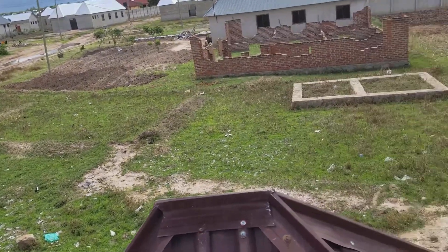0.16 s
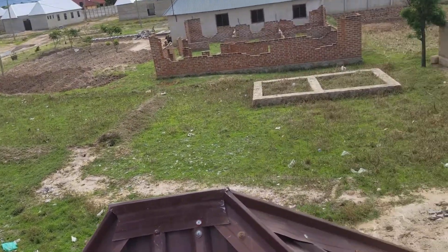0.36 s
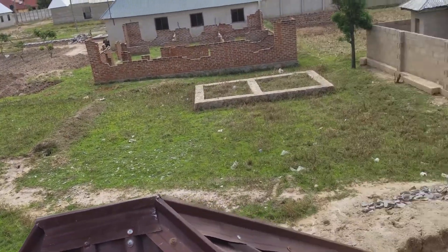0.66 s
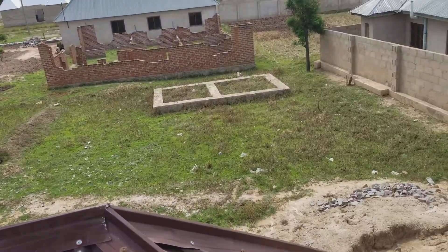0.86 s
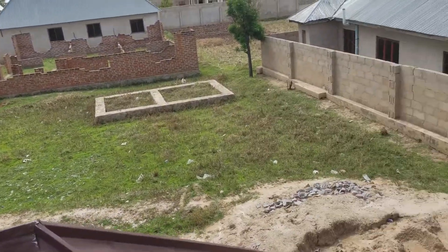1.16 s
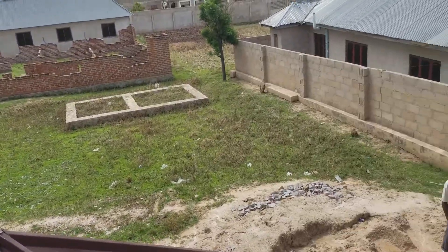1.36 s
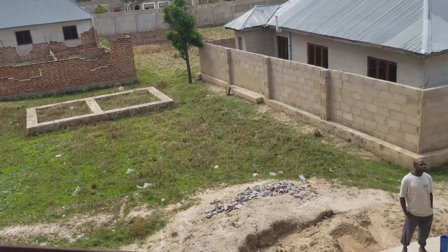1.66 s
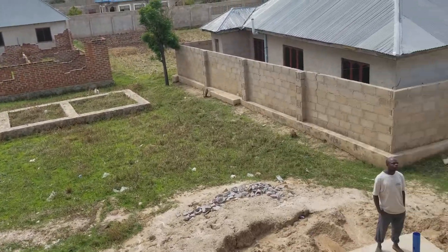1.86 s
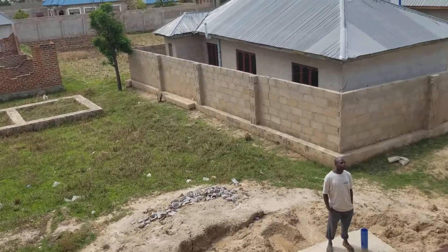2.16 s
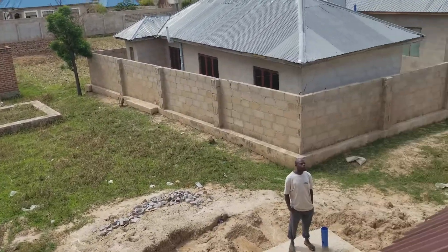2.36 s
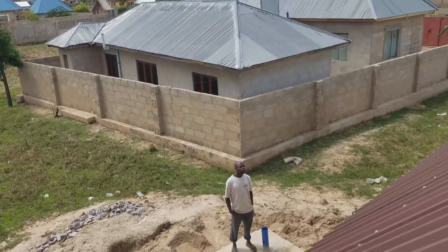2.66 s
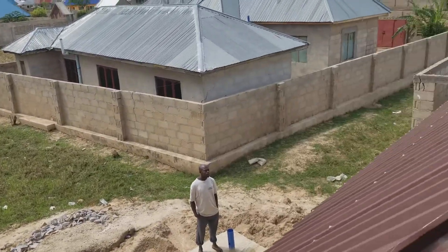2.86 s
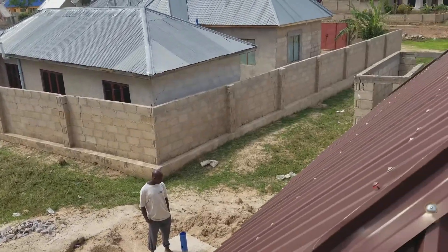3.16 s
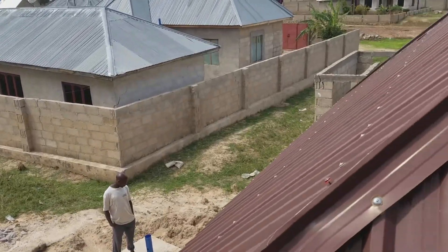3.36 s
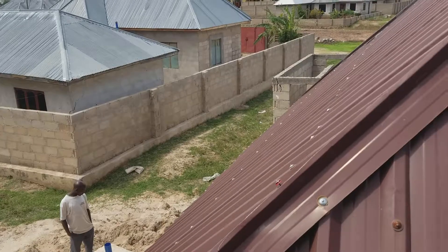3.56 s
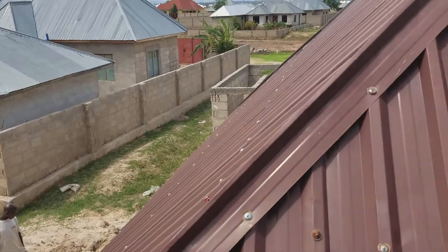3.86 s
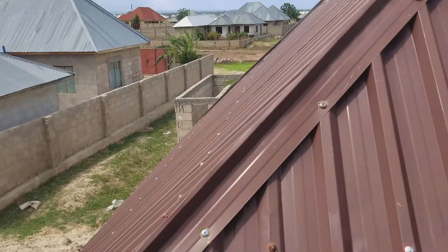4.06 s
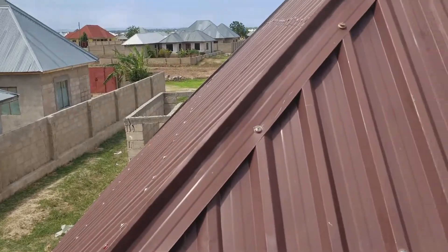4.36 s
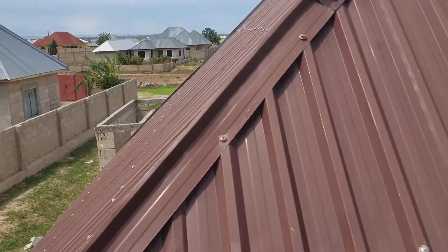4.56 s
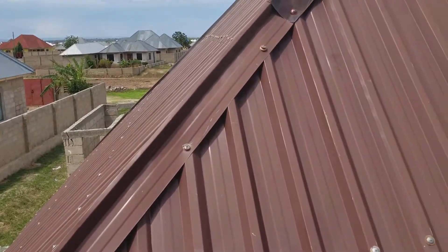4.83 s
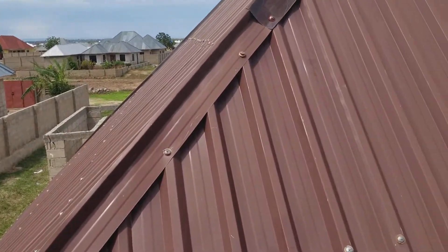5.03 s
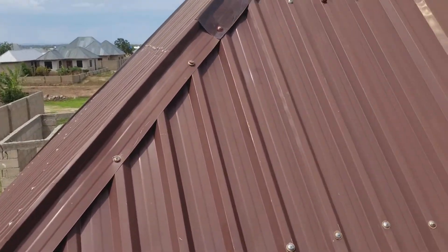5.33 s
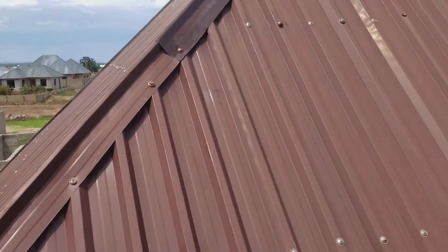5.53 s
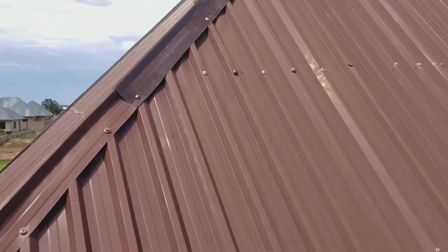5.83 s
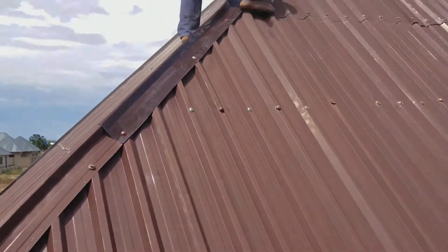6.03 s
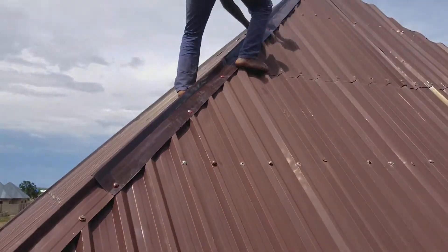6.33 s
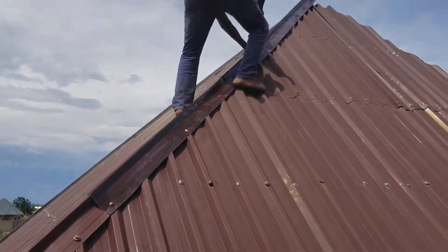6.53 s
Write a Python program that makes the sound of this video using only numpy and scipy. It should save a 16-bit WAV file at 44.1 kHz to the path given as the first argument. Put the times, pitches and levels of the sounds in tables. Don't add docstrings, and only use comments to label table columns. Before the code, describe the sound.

Dull, hollow footfalls thud across a ribbed metal roof outdoors, faint at first, then loud and close, each ringing briefly with loose sheet clatter.

```python
import sys
import numpy as np
from scipy import signal
from scipy.fft import rfft, irfft, next_fast_len
from scipy.io import wavfile
from scipy.ndimage import uniform_filter1d, minimum_filter1d, map_coordinates

SR = 44100
rng = np.random.default_rng(int(sys.argv[2]) if len(sys.argv) > 2 else 0)


def waveform_to_disk(signal):
    frames = np.transpose(np.atleast_2d(signal))
    scaled = np.clip(frames, -1, 1) * 32767
    samples = np.round(scaled).astype(np.int16)
    wavfile.write(sys.argv[1], SR, samples)


def boost_factor(decibels):
    exponent = np.asarray(decibels, float) / 20
    return 10 ** exponent


N = 295055

# (time [s], peak [dB], bass [dB], top [dB], ring length [factor])
FAR_BLOWS = [
    (-.1, -23, -4.5, 14, 1.17),
    (0.251, -32.5, -5, -4, 0.72),
    (0.651, -29, -13, 14, 0.7),
    (.697, -21, -3, 5.5, 1.11),
    (1.029, -16, -12.5, 15, 0.83),
    (1.391, -24, -4, 15, 1.17),
    (1.728, -19.5, -1.5, 11, 1.36),
    (2.124, -16.5, 0, 6.5, 1.41),
    (2.623, -10, 1, 12, 1.13),
]
# (time [s], peak [dB], bass [dB], top [dB], ring length [factor])
NEAR_BLOWS = [
    (3.149, -5.5, 4.5, -0.42, 0.7),
    (3.182, -3, 4, -2.6, 0.83),
    (3.661, -5, 1.5, 0.51, 0.85),
    (3.69, -6, -4, 1.5, 0.73),
    (4.176, -3.5, -1, 1, 0.78),
    (4.660, -6, -0.5, 0.78, .9),
    (5.113, -6, -1.5, 0, 0.89),
    (5.581, -5.5, -1, 2.5, 0.84),
    (6.077, -3.5, -1, 2.4, 0.79),
]


def on_log(hz, table, index=1):
    rows = np.array(table, float)
    return np.interp(np.log(hz), np.log(rows[:, 0]), rows[:, index])


def walk(rate):
    k = int(SR / rate)
    held = np.repeat(rng.standard_normal(N // k + 1), k)
    return 1.3 * uniform_filter1d(uniform_filter1d(held, k), k)[:N]


def dove():
    # (start [s], length [s], crest [Hz], level [dB])
    coos = [
        (.42, 0.059, 470, -55),
        (0.525, .102, 436, -49.5),
    ]
    time, out = np.arange(N) / SR, 0
    for s, length, hz, db in coos:
        part = np.clip((time - s) / length, 0, 1)
        sagging_hz = hz * (1 - 0.078 * np.abs(part - .25) / 0.67)
        turn = 2 * np.pi * np.cumsum(sagging_hz) / SR
        octave = boost_factor(-14.5) * np.clip((part - .3) / .15, 0, 1) * np.sin(2 * turn)
        swell = boost_factor(db + 1.52 * walk(60)) * np.sin(np.pi * part) ** .6
        out = out + np.sqrt(2) * swell * (np.sin(turn) + octave)
    return out


def whistle(s, length, crest_hz, fall_hz, db, arch, swoops=False):
    crest_at, climb_share = arch
    swoop_s, swoop_hz = 0.035, 3500
    lead_s = swoop_s if swoops else 0
    fade_in_s, fade_out_s = .022 if swoops else .011, .011
    time = np.arange(N) / SR
    crest_s = s + crest_at * length
    place = np.interp(time, [s, crest_s, s + length], [-1, 0, 1])
    hz = crest_hz - fall_hz * np.abs(place) ** 1.35 * np.where(place < 0, climb_share, 1)
    if swoops:
        hz = hz + (swoop_hz - hz) * np.clip((s - time) / swoop_s, 0, 1) ** 2
    pitch = uniform_filter1d(hz, 300) * (1 + 0.009 * walk(190))
    fade = np.minimum((time - s + lead_s) / fade_in_s, (s + length - time) / fade_out_s)
    flutter_db = 4 * np.tanh(walk(170))
    loud = np.clip(fade, 0, 1) * boost_factor(db + flutter_db - 2.5)
    beads = np.cos(np.pi * 58 * (time - crest_s + .004)) ** 4
    throb_db = 7.5 * max(fall_hz / 1000 - .5, 0)
    loud = loud * boost_factor(throb_db * (.6 - 2 * beads))
    return np.sqrt(2) * loud * np.sin(2 * np.pi * np.cumsum(pitch) / SR)


def birds():
    # (start [s], length [s], crest [Hz], fall [Hz], level [dB])
    warbles = [
        (.141, .078, 3050, 640, -55.5),
        (3.026, .084, 3500, 1400, -55.5),
    ]
    # (start [s], length [s], crest [Hz], fall [Hz], level [dB])
    chirps = [
        (.165, .045, 3740, 90, -68),
        (3.03, .066, 3960, 650, -66),
        (3.112, .034, 2960, 260, -60),
        (5.05, .058, 4010, 820, -61),
    ]
    # (start [s], length [s], crest [Hz], fall [Hz], level [dB])
    rising_chirp = (5.038, .06, 3100, 110, -58)
    # (delay [s], level [dB])
    house_echoes = [(.011, -11), (.021, -13), (.033, -15), (.047, -17), (.09, -16), (.15, -18), (.21, -14)]
    calls = sum(whistle(*call, (.4, .46), swoops=True) for call in warbles)
    calls = calls + sum(whistle(*call, (.55, .68)) for call in chirps)
    calls = calls + whistle(*rising_chirp, (.5, 2.5))
    echoes = []
    for stretch in (1, 1.13):
        echoes.append(sum(boost_factor(db) * np.roll(calls, int(s * stretch * SR)) for s, db in house_echoes))
    return (calls + np.array(echoes)) * boost_factor(np.array([[2.5], [-2.5]]))


def wind():
    # (start [s], peak [s], end [s], rumble [dB])
    gusts = [
        (-.08, 0.034, 0.097, -24),
        (.06, 0.127, 0.19, -32),
        (0.161, .28, 0.43, -27),
        (.42, .5, 0.76, -39),
        (2.762, 2.949, 2.98, -28),
        (3.102, 3.143, 3.1, -26),
    ]
    # (time [s], peak [dB], pitch [Hz])
    pops = [(.041, -15, 95), (.124, -22, 130), (0.164, -24, 100), (.208, -17, 125), (0.227, -20, 120),
            (0.256, -10, 95), (0.272, -10.5, 140), (0.285, -9.5, 150), (0.31, -11, 115), (0.326, -13, 150),
            (0.358, -15, 140), (.379, -21, 110), (0.414, -23, 110), (.482, -27, 100), (0.509, -19, 170),
            (0.534, -25, 100)]
    time, edge_db = np.arange(N) / SR, -19.5
    gust = 0
    for *span, db in gusts:
        shape_db = np.interp(time, span, [edge_db, 0, edge_db], left=-99, right=-99)
        gust = gust + boost_factor(db + shape_db)
    band = signal.butter(2, [60, 170], "bandpass", fs=SR, output="sos")
    low = signal.sosfilt(band, rng.standard_normal((2, N)))
    flutter = boost_factor(2.5 * walk(30) + np.array([[3.5], [-8]]))
    rumble = low / low.std() * uniform_filter1d(gust, 400) * flutter
    out, t = np.zeros((2, N)), np.arange(-.02, .03, 1 / SR)
    for s, db, hz in pops:
        swing = np.sin(2 * np.pi * hz * t) * np.exp(-(t * hz / .5) ** 2)
        edge = .6 * np.exp(-np.abs(t) / .0007) * np.sin(2 * np.pi * 3 * hz * t)
        start = int((s + t[0]) * SR)
        out[:, start:start + len(t)] += boost_factor(db + np.array([[0], [-22]])) * (swing + edge)
    return rumble + out


def knocks():
    # (time [s], peak [dB], pitch [Hz], grit t60 [s])
    raps = [
        (.651, -26, 900, 0.09),
        (.703, -29, 700, .06),
        (1.033, -32.5, 2480, 0.19),
        (1.251, -29, 786, 0.11),
        (3.313, -9, 663, 0.046),
        (4.972, -16.5, 786, 0.18),
        (4.982, -28, 1246, 0.26),
        (6.52, -54, 2400, 0.29),
        (6.574, -54, 2400, 0.14),
    ]
    partials = ((.7, 0.62), (1, 1), (1.55, 0.33), (2.3, 0.16))
    out, t = np.zeros((2, N + SR)), np.arange(SR // 4) / SR
    onset = 1 - np.exp(-t / 0.0019)
    for s, db, hz, t60 in raps:
        tone = sum(share * np.sin(2 * np.pi * hz * ratio * t) for ratio, share in partials)
        band = signal.butter(3, [.55 * hz, 1.9 * hz], "bandpass", fs=SR, output="sos")
        grit = signal.sosfilt(band, rng.standard_normal((2, len(t))))
        rap = boost_factor(-60 * t / 0.035) * tone + 0.8 * boost_factor(-60 * t / t60) * grit
        start = int(s * SR)
        out[:, start:start + len(t)] += boost_factor(db + 1.5) * rap * onset
    return out[:, :N]


def ribs():
    # (pitch [Hz], level [dB], t60 [s])
    rib_modes = [(1108, -22.5, 0.39), (1546, -28.5, .25), (1950, -30, .22), (2460, -29.5, .35),
                 (2770, -34, .3), (2970, -34.5, 0.28)]
    clatter_db, clatter_t60_s, clatter_spread_s = -19.5, 0.038, .04
    tilt_db, fade_db_s = -6, 90
    out, t = np.zeros((2, N + SR)), np.arange(SR // 2) / SR
    short = t[:SR // 12]
    hz, db, t60 = np.transpose(rib_modes)[:, :, None]
    for s, peak_db, *_, length in FAR_BLOWS[1:] + NEAR_BLOWS:
        peak_db = peak_db - 2.5 * (s < NEAR_BLOWS[0][0])
        detune, share, left, right = rng.standard_normal((4, len(hz), 1))
        start = int(s * SR)
        for port, turn in enumerate((left, right)):
            decay = boost_factor(db + 2.5 * np.tanh(share) - 60 * t / (t60 * length))
            tones = decay * np.sin(2 * np.pi * hz * (1 + .03 * detune) * t + 2 * turn)
            out[port, start:start + len(t)] += boost_factor(peak_db) * tones.sum(axis=0) * (1 - np.exp(-t / .004))
        for wait, octave, size, pan in rng.random((24, 4)):
            lag = -clatter_spread_s * np.log(1 - .98 * wait)
            ping = np.sin(2 * np.pi * 500 * 4 ** octave * short) * boost_factor(-60 * short / clatter_t60_s)
            ping = ping * np.minimum(short / .001, 1)
            ping_db = peak_db + clatter_db + tilt_db * (2 * octave - 1) + 7 * size - fade_db_s * lag / length
            start = int((s + lag) * SR)
            out[:, start:start + len(short)] += boost_factor(ping_db + np.array([[6], [-6]]) * (pan - .5)) * ping
    return out[:, :N] * boost_factor(np.array([[2.5], [-2.5]]))


def panel():
    # (pitch [Hz], level [dB], t60 [s])
    panel_modes = [(108.4, -20, 0.86), (207.8, -23.5, 0.86), (288.6, -22.5, 0.68), (355, -21.5, 0.91),
                   (435, -27.5, 0.93), (712, -20, 0.59), (984, -23.5, 0.48), (1090, -43.5, 1)]
    out, t = np.zeros(N + SR), np.arange(SR) / SR
    hz, db, t60 = np.transpose(panel_modes)[:, :, None]
    push = np.sin(2 * np.pi * 330 * t + 1.16 * np.sin(2 * np.pi * 700 * t)) * np.exp(-((t - .0035) / 0.002) ** 2)
    loft_boom = boost_factor(-5.5) * np.sin(2 * np.pi * 338 * t) * np.exp(-((t - 0.014) / 0.0084) ** 2)
    blows = FAR_BLOWS[1:] + NEAR_BLOWS
    chance = rng.standard_normal((len(blows), 2, len(hz), 1))
    for (s, peak_db, bass_db, *_, length), (detune, share) in zip(blows, chance):
        decay = boost_factor(db + 2.27 * share + bass_db * (hz < 250) - 60 * t / (t60 * length))
        modes = decay * np.sin(2 * np.pi * hz * (1 + 0.01957 * detune) * t)
        ring = modes.sum(axis=0) * (1 - np.exp(-t / 0.0019))
        dent = -boost_factor(-1.5 if peak_db > -12 else -9) * push
        boom = loft_boom * (s < NEAR_BLOWS[0][0])
        start = int(s * SR)
        out[start:start + SR] += boost_factor(peak_db) * (dent + boom + ring)
    return out[:N]


def band_noise(hz):
    # (frequency [Hz], share common to both ports [0-1])
    likeness = [(60, 0.99), (130, 0.99), (290, 0.98), (640, 0.82), (1410, 0.32), (3100, 0), (6820, 0),
                (15000, 0)]
    # (frequency [Hz], left minus right [dB])
    port_balance = [(60, 0), (110, 1.5), (200, 1.0), (380, 2), (700, 0.5), (1290, 1), (2380, 6),
                    (4400, 3.5), (8120, 2), (15000, 2.5)]
    size = next_fast_len(N)
    octaves = np.log2(np.maximum(np.arange(size // 2 + 1) * SR / size, 1) / hz)
    window = np.cos(np.pi / 2 * np.clip(3 * octaves, -1, 1))
    mid, side = irfft(rfft(rng.standard_normal((2, size))) * window, size)[:, :N]
    like = np.clip(on_log(hz, likeness), 0, 1)
    sign = np.array([[1], [-1]])
    ports = np.sqrt(1 + like) * mid + sign * np.sqrt(1 - like) * side
    return ports * boost_factor(sign * on_log(hz, port_balance) / 2)


def ring_power(hz, blows, colour, spread, hop):
    # (frequency [Hz], rise [ms], first decay t60 [s], loft decay t60 [s], loft share [dB])
    ring_times = [(50, 3.2, 0.48, 1.77, -2.5), (130, 2.2, 0.69, 2.04, -3), (333, 2.6, 0.44, 1.243, -5.5),
                  (900, 4.7, 0.42, 0.88, -4), (1866, 1.8, 0.59, 1.17, -18), (3020, 6.1, 0.4, 1.32, -19.5),
                  (3780, 6.2, 0.41, 1.33, -25.5), (4980, 3.5, 0.41, 1.36, -20.5),
                  (6760, 11, 0.3, 0.68, -31.5), (12000, 1.7, 0.28, 0.73, -19)]
    rise_ms, first, loft, loft_db = (on_log(hz, ring_times, index=k) for k in range(1, 5))
    slap_db, slap_t60_s = 2.5, 0.17
    spread = 1 + (spread - 1) * min(1, 980 / hz)
    arrivals = ((-0.0037, -13.5), (0, 0), (0.14, -9.5 - 7.9 * hz / 1000))
    time, power = np.arange(0, N, hop) / SR, 0
    for s, db, bass_db, top_db, length in blows:
        mid_db = 0.1 * top_db - 5 * (length - 1)
        tone_db = on_log(hz, [(130, bass_db), (500, 0.019), (1800, mid_db), (7000, top_db)])
        for lag, echo_db in arrivals:
            t = np.maximum(time - s - lag, 0)
            fall = boost_factor(2 * slap_db - 120 * t / slap_t60_s)
            fall = fall + boost_factor(-120 * t / (first * length)) + boost_factor(2 * loft_db - 120 * t / (loft * length))
            build = (1 - np.exp(-1000 * t / (spread * rise_ms))) ** 2
            power = power + boost_factor(2 * (db + tone_db + echo_db + on_log(hz, colour))) * build * fall
    return power


def sheet_and_air():
    # (frequency [Hz], density [dB per Hz])
    far_sheet = [(21, -39), (35, -3.5), (90, 2), (222, -5.5), (379, 8), (557, 2), (1110, -0.5), (1510, -9),
                 (2660, -20.5), (3710, -31), (6360, -50.5), (8300, -58.5), (12400, -46.5), (16000, -57)]
    # (frequency [Hz], density [dB per Hz])
    near_sheet = [(21, -34), (35, -1), (210, -2), (443, -3), (557, -4.5), (684, -4), (1090, -4.5),
                  (1510, -7), (1860, -10.5), (2590, -11.5), (3910, -20.5), (5590, -25.5), (7610, -40.5),
                  (12400, -32), (16000, -35)]
    # (frequency [Hz], density [dB per Hz])
    air_colour = [(18, -50.5), (40, -19.5), (90, -7.5), (200, -5.5), (420, -13), (800, -31), (1600, -29),
                  (2200, -29.5), (3200, -35.5), (4500, -45.5), (8000, -54), (12000, -48.5), (16000, -56)]
    # (time [s], level [dB])
    air_ride = [(0, -42), (3.099, -37.5), (3.299, -58.5), (6.3, -46.5), (6.69, -46)]
    hop = 16
    out, rattle, swell = 0, 1.2 * walk(120), 1.2 * walk(1.5)
    time = np.arange(N)
    air_db = np.interp(time / SR, *np.transpose(air_ride)) + 14 + swell
    for hz in 35 * 2 ** (np.arange(27) / 3):
        far = ring_power(hz, FAR_BLOWS, far_sheet, 5.6, hop)
        near = ring_power(hz, NEAR_BLOWS, near_sheet, 1, hop)
        ring = np.interp(time, np.arange(0, N, hop), np.sqrt(2.26 * far + 2.09 * near))
        sheet = ring * boost_factor(rattle + 1.2 * walk(35))
        air = boost_factor(air_db + on_log(hz, air_colour))
        out = out + band_noise(hz) * np.hypot(sheet, air)
    return out


def scene():
    # (time [s], lag [ms])
    left_lag = [(0, 0.22), (2.9, 0.29), (3.4, .14), (4.8, 0.13), (5.2, 0.035), (6.69, 0.023)]
    roof = sheet_and_air() + panel() * boost_factor(np.array([[.6], [-.6]])) + knocks()
    time = np.arange(N) / SR
    late = time - np.interp(time, *np.transpose(left_lag)) / 1000
    roof = np.array([map_coordinates(roof[0], [late * SR], mode="nearest"), roof[1]])
    return roof + wind() + birds() + dove() + ribs()


def low_pass(x):
    return signal.sosfilt(signal.butter(12, 16600, fs=SR, output="sos"), x)


def record(dry):
    # (frequency [Hz], gain [dB])
    port_colour = [(20, -9), (33, -10.5), (55, 0), (2100, 0.5), (2500, 2.5), (3120, 0.5), (3450, 0),
                   (4600, 0), (6000, -2)]
    limit_db, hold = -3, int(.01 * SR)
    dry = dry + boost_factor(-90) * rng.standard_normal(dry.shape)
    dry = signal.sosfilt(signal.butter(2, 41.8, "highpass", fs=SR, output="sos"), dry)
    dry = signal.sosfilt(signal.ellip(8, .2, 60, 15900, fs=SR, output="sos"), dry)
    size = next_fast_len(N)
    colour = boost_factor(on_log(np.arange(1, size // 2 + 2) * SR / size, port_colour))
    dry = irfft(rfft(dry, size) * colour, size)[:, :N]
    gain = np.minimum(1, boost_factor(limit_db) / np.abs(dry).max(axis=0).clip(1e-6))
    gain = uniform_filter1d(minimum_filter1d(gain, hold), hold)
    return low_pass(np.clip(dry * gain ** 0.28, -1, 1))


dry = scene()
out = record(dry)
waveform_to_disk(out)
```